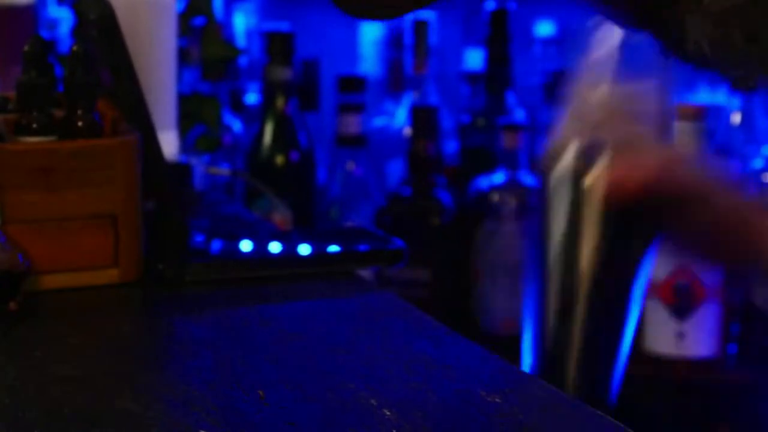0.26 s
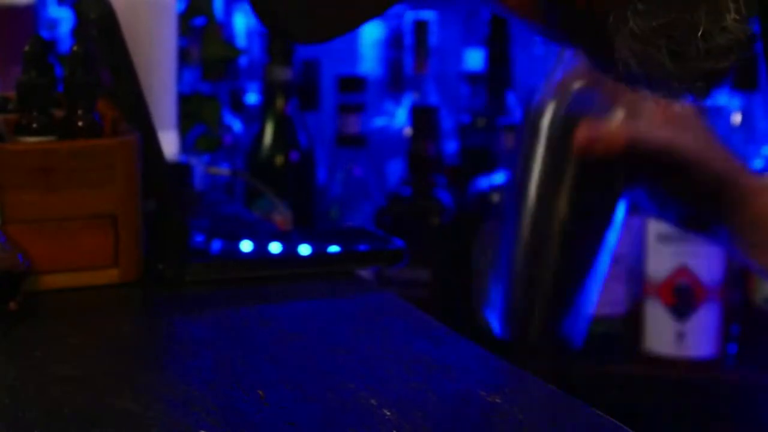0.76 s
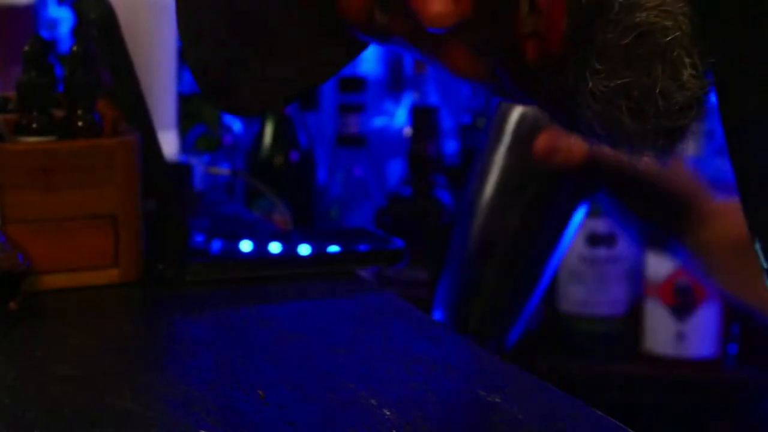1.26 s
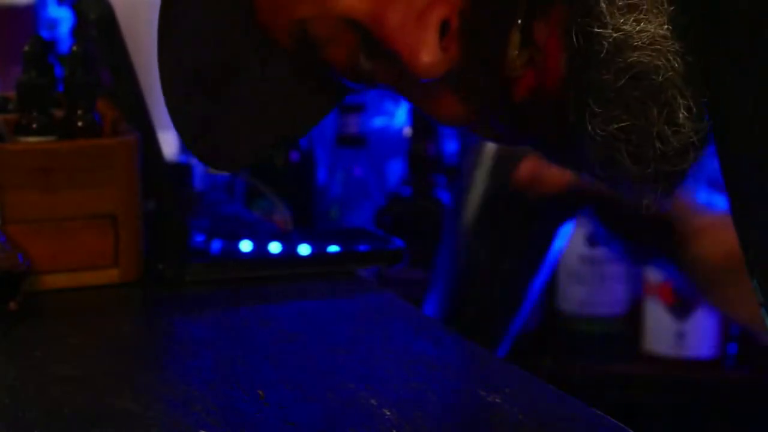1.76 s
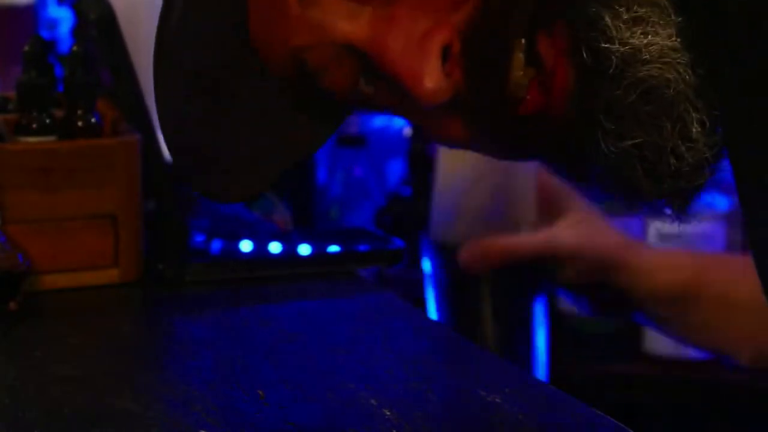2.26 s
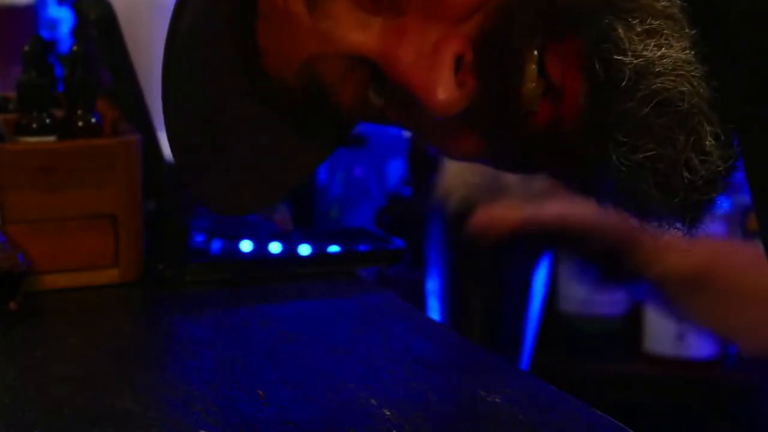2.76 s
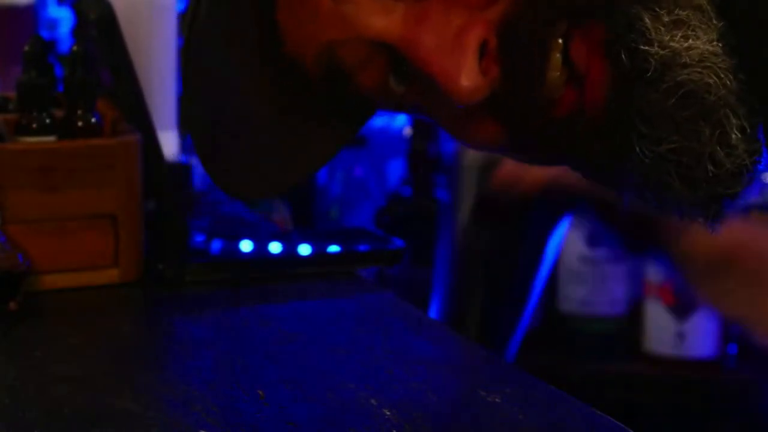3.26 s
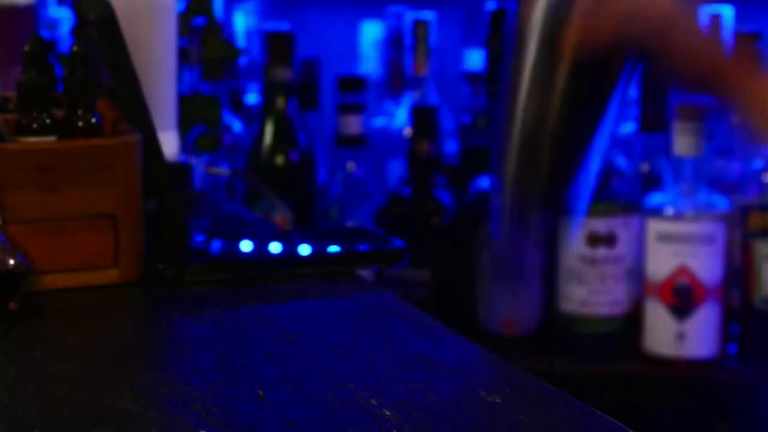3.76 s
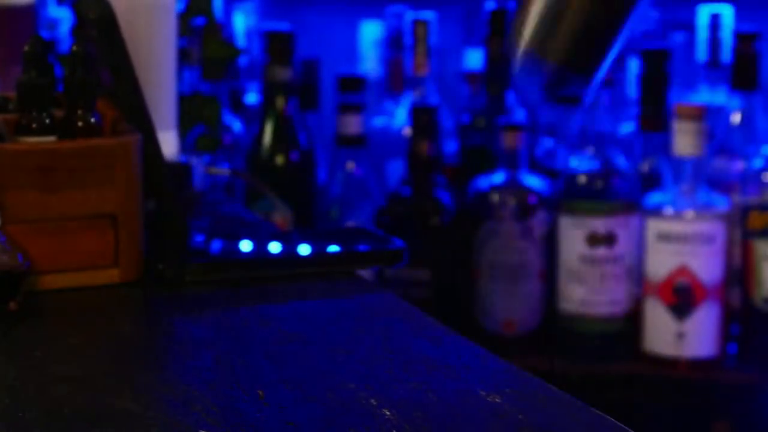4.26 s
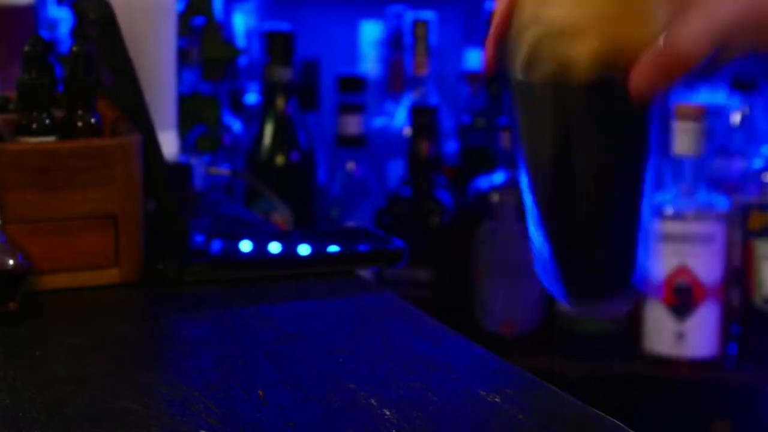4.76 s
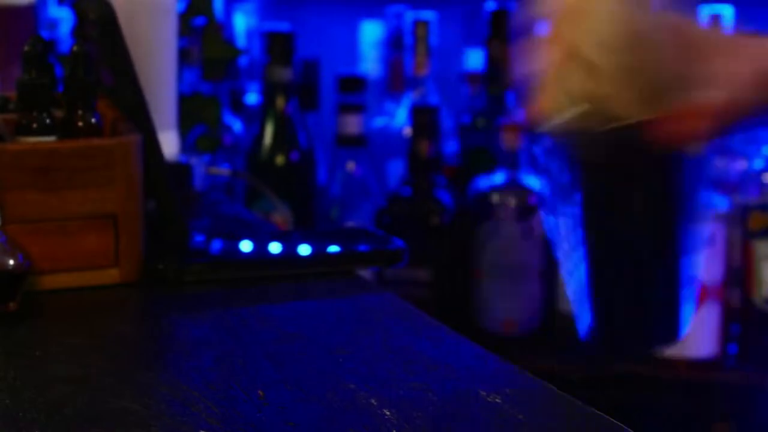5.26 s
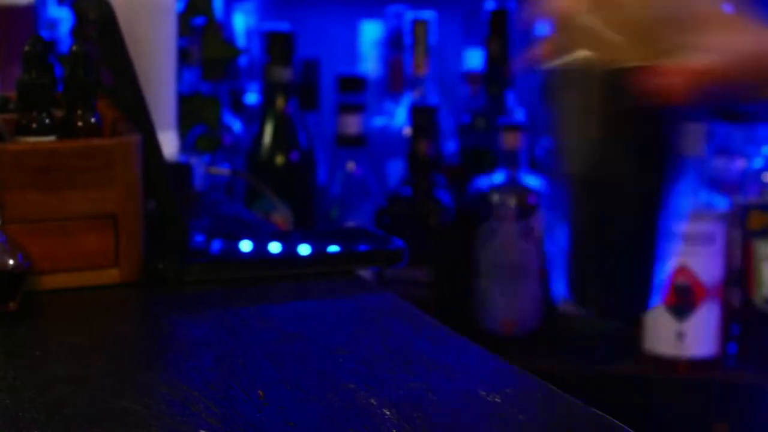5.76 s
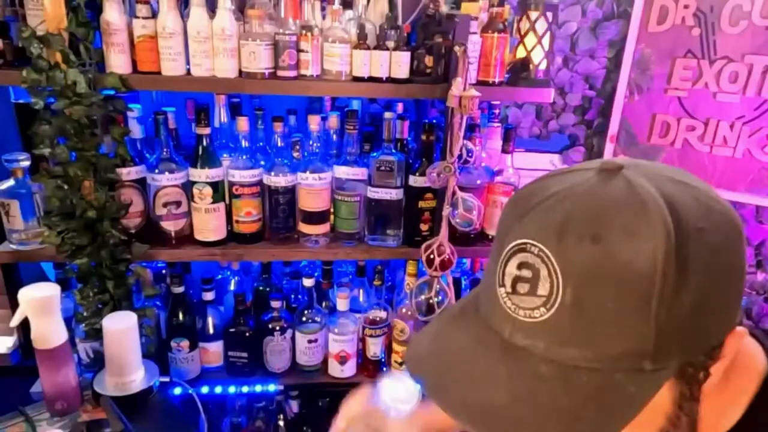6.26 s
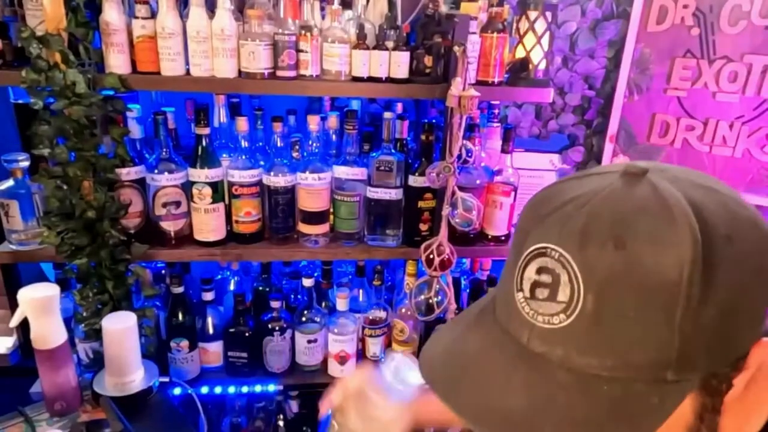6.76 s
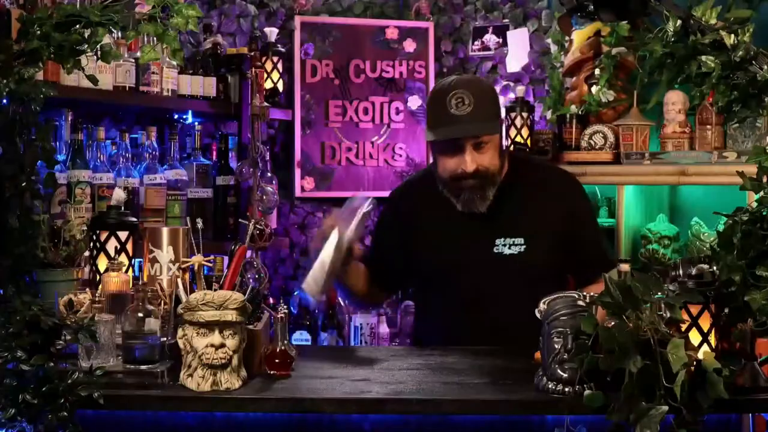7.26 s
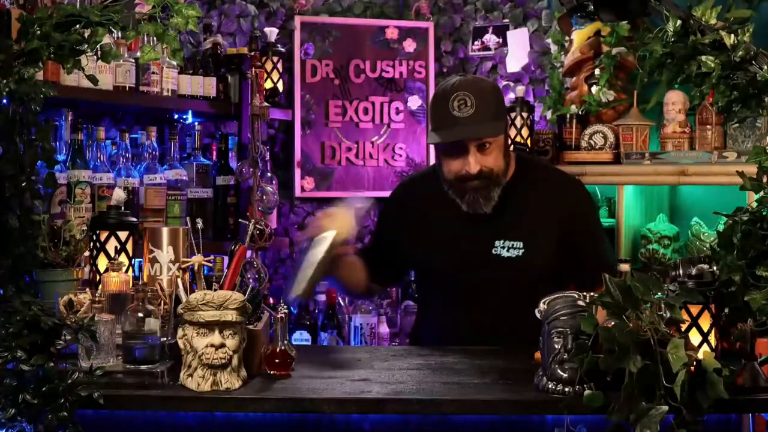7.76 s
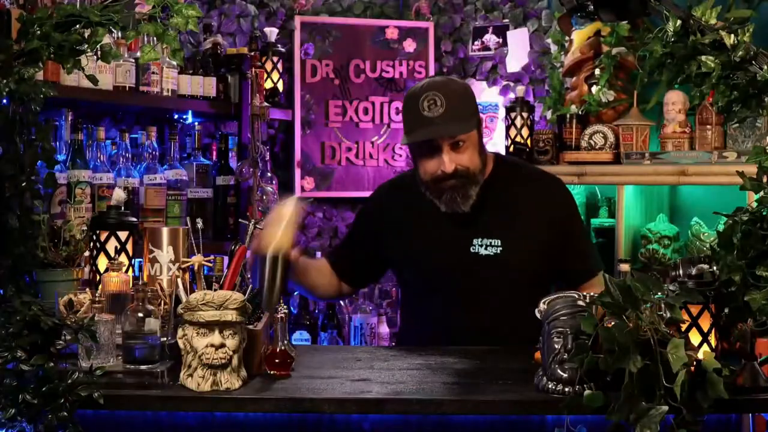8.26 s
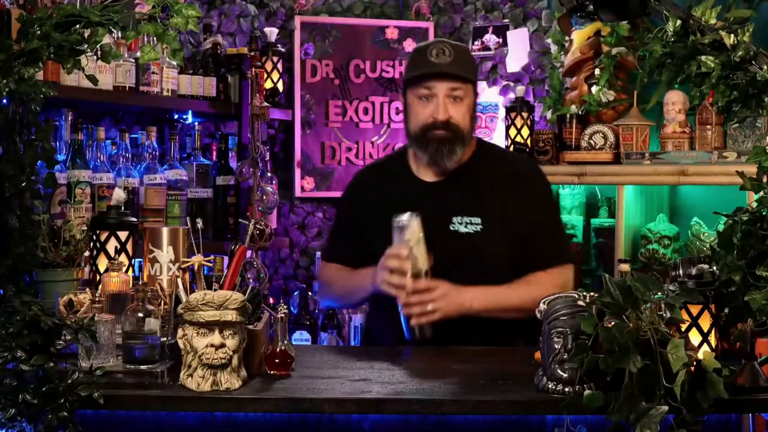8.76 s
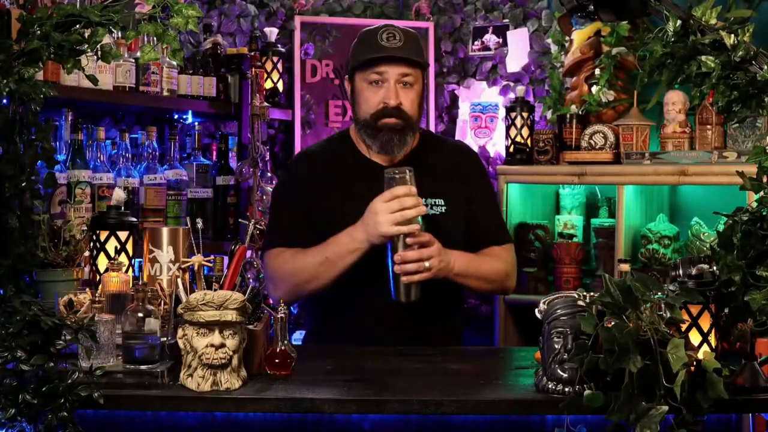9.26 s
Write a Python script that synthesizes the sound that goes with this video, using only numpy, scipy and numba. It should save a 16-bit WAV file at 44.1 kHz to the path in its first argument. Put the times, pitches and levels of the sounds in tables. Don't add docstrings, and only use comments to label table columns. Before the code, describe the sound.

A dense run of ice knocks inside a hand-damped shaker: dry clacks on wet glass, duller metallic knocks on tin, brief hollow tones and small splintering cracks. The rhythm is irregular, with tiny gaps falling nearly silent at first and stronger clusters from the middle on. Very little room, only a short diffuse tail from close walls. Near the end the rattling thins, then one sharp slap with a low thump, and small settling clicks.

```python
import sys
import numpy as np
from scipy import signal
from scipy.io import wavfile
from scipy.ndimage import uniform_filter1d, minimum_filter1d
from numba import njit

SR = 44100
rng = np.random.default_rng(int(sys.argv[2]) if len(sys.argv) > 2 else 0)


def gain_from_decibels(decibels):
    exponent = np.asarray(decibels, float) / 20
    return 10 ** exponent


def int16_out(signal):
    q = np.round(np.clip(np.atleast_2d(signal).T, -1, 1) * 32767)
    wavfile.write(sys.argv[1], SR, q.astype(np.int16))


N = 419391


def rumble():
    # start_s, level_db
    shudder = [
        (0.0, -107),
        (1.3, -77.5),
        (1.53, -99),
        (2.429, -81),
        (2.88, -69.5),
        (4.579, -74),
        (5.82, -100.5),
        (6.268, -85),
        (8.311, -72),
        (9.5, -99),
    ]
    start_s, level_db = np.transpose(shudder)
    band = signal.butter(2, [70., 105.], "bandpass", fs=SR, output="sos")
    x = signal.sosfilt(band, rng.standard_normal(N))
    level = gain_from_decibels(np.interp(np.arange(N) / SR, start_s, level_db) + 1.5)
    return x / np.sqrt(np.mean(x ** 2)) * level


def room(x):
    t60_s, gap_s, level_db = 0.19, 0.0015, -10.5
    t = np.arange(int(.4 * SR)) / SR
    tail = rng.standard_normal(len(t)) * gain_from_decibels(-60 * t / t60_s) * (t > gap_s)
    tail /= np.sqrt(np.sum(tail ** 2))
    return signal.fftconvolve(x, tail)[:N] * gain_from_decibels(level_db)


def ticks(table, db, rise_s, t60_s, spread):
    out, t = np.zeros(N + SR), np.arange(SR // 10) / SR
    shape = gain_from_decibels(-60 * t / t60_s) * (1 - np.exp(-t / rise_s))
    shape /= shape.max()
    for start_s, peak_db, pitch_hz in table:
        phase = 2 * np.pi * pitch_hz * t
        neighbours = np.sin(phase * (1 - spread)) + np.sin(phase * (1 + 1.4 * spread))
        tone = 1.08 * np.sin(phase) + 0.21 * neighbours
        out[int(start_s * SR):][:len(t)] += gain_from_decibels(peak_db + db) * shape * tone
    return out[:N]


def hollow_ticks():
    # start_s, peak_db, pitch_hz
    hollow_strikes = [(0.458, -28, 738), (2.943, -28.5, 600), (3.183, -37, 746), (3.599, -30, 623),
                      (3.639, -28.5, 753), (3.819, -30, 594), (3.864, -31, 890), (4.288, -32, 880),
                      (4.32, -33, 567), (4.381, -27, 560), (4.416, -28, 1075), (4.458, -36, 995),
                      (4.544, -29, 680), (4.576, -27, 944), (4.634, -28.5, 820), (4.875, -28.5, 1113),
                      (5.313, -25.5, 956), (5.337, -29.5, 1086), (5.453, -29, 523), (5.611, -25, 1043),
                      (5.887, -28, 575), (6.452, -31, 265), (6.488, -31, 510), (6.609, -32, 805),
                      (6.92, -26, 593), (6.973, -31.5, 570), (7.199, -36, 860), (7.209, -35, 550),
                      (7.631, -32, 820), (8.247, -33, 775), (8.268, -33, 533), (8.53, -23, 583),
                      (8.585, -35, 680)]
    return ticks(hollow_strikes, -3.0, rise_s=0.00052, t60_s=.055, spread=.2)


def tin_ticks():
    # start_s, peak_db, pitch_hz
    tin_strikes = [(0.647, -21.5, 1730), (1.363, -25, 1890), (1.374, -32, 1810), (2.077, -24.5, 1620),
                   (2.947, -26, 1850), (3.171, -27, 1320), (3.185, -27, 1800), (3.312, -30, 2400),
                   (3.329, -20.5, 1770), (3.527, -28, 1870), (3.55, -26, 1850), (3.821, -21, 2470),
                   (3.993, -20.5, 1900), (4.024, -19.5, 1760), (4.239, -22.5, 1850), (4.419, -14, 1750),
                   (4.565, -20, 2270), (4.577, -31, 1160), (4.612, -23, 2290), (5.884, -18.5, 2260),
                   (5.009, -25.5, 2520), (5.073, -23, 2150), (5.111, -26.5, 2010), (5.306, -15.5, 1730),
                   (5.446, -18.5, 1705), (5.454, -22, 1690), (5.607, -15, 1306), (5.616, -18, 1360),
                   (5.78, -24.5, 1850), (5.795, -23.5, 2010), (5.813, -25, 1920), (6.245, -30, 1800),
                   (6.252, -21, 1860), (6.316, -24, 1720), (6.346, -26.5, 1770), (6.451, -26, 1630),
                   (7.62, -21, 1730), (7.751, -27.5, 2490), (7.958, -24, 2380), (8.113, -29, 1830),
                   (8.249, -32, 2100), (8.568, -25, 2220), (8.618, -23.5, 1660)]
    return ticks(tin_strikes, -4.3, rise_s=0.00028, t60_s=0.042, spread=0.15)


def glass_ticks():
    # start_s, peak_db, pitch_hz
    glass_strikes = [(0.687, -23.5, 3250), (1.251, -24, 4800), (1.261, -21, 2890), (1.299, -27, 2930),
                     (1.361, -23.5, 4500), (1.373, -23, 3050), (1.587, -22, 5320), (1.972, -25, 3120),
                     (2.066, -15.5, 5060), (2.643, -27.5, 5330), (2.751, -26.5, 4600), (2.946, -22.5, 4940),
                     (3.119, -24.5, 4760), (3.311, -19.5, 4300), (3.324, -17.5, 4550), (3.41, -21, 4400),
                     (3.52, -19.5, 3430), (3.822, -17.5, 4800), (3.838, -30, 5150), (3.864, -27.5, 3100),
                     (4.012, -25.5, 3050), (4.111, -24, 4350), (4.141, -23.5, 3230), (4.25, -23.5, 4270),
                     (4.273, -21.5, 4150), (4.546, -15.5, 3300), (4.576, -27, 2680), (4.883, -8, 2530),
                     (5.007, -26, 3100), (5.303, -18.5, 2530), (5.314, -17, 2460), (5.446, -14, 3270),
                     (5.505, -28, 3450), (5.547, -27, 3250), (5.603, -23, 5140), (5.623, -21, 4340),
                     (6.098, -28.5, 5150), (6.132, -25.5, 4000), (6.196, -24, 2960), (6.609, -23.5, 4020),
                     (7.2, -16, 3160), (7.692, -27, 3220), (7.749, -27.5, 4360), (7.789, -26, 4100),
                     (7.923, -21, 4740), (7.951, -23, 4640), (7.974, -25, 3200), (8.077, -19, 4130),
                     (8.249, -19, 4620), (8.258, -16.5, 3460), (8.421, -20, 4700), (8.427, -23, 4870),
                     (8.537, -25, 3930), (8.568, -29, 3340), (8.616, -26.5, 4000),
                     (.583, -26, 5050), (.591, -27, 3000), (0.632, -23, 4870), (.674, -29, 3000),
                     (0.71, -30, 3570), (1.575, -29.5, 3070), (2.242, -30, 4720), (3.187, -32, 2800),
                     (3.278, -25.5, 4300), (5.316, -20, 3500), (7.091, -36, 4730), (5.837, -28.5, 4300),
                     (6.051, -28, 3170), (6.211, -32, 3100), (6.312, -11, 3380), (6.483, -32.5, 3650),
                     (7.334, -28, 3220), (7.969, -22.5, 4800)]
    return ticks(glass_strikes, -0.23, rise_s=0.00044, t60_s=0.008, spread=0.28)


def notes(table, db, rough, glide=0.):
    out, t = np.zeros(N + SR), np.arange(SR // 4) / SR
    for start_s, peak_db, pitch_hz, t60_s in table:
        wobble = uniform_filter1d(rng.standard_normal((2, len(t))), size=130) * rough
        decay = gain_from_decibels(-60 * t / max(t60_s, .004))
        shape = decay * (1 - np.exp(-t / 0.00069)) * (1 + wobble[0])
        tone = np.sin(2 * np.pi * pitch_hz * t * (1 + glide * t) + wobble[1])
        out[int(start_s * SR):][:len(t)] += gain_from_decibels(peak_db + db) * shape * tone
    return out[:N]


def hollow_notes():
    # start_s, peak_db, pitch_hz, t60_s
    cavity = [(0.173, -40.5, 544, 0.23), (0.304, -54, 610, 0.14), (0.358, -49, 660, 0.24),
              (0.429, -39, 624, 0.22), (0.693, -26, 1044, 0.059), (1.129, -28, 958, 0.14),
              (2.493, -31.5, 720, 0.11), (2.761, -28, 814, 0.058), (3.178, -25, 780, 0.079),
              (3.41, -29, 763, 0.12), (4.416, -43.5, 542, 0.27), (5.013, -12.5, 730, 0.0085),
              (7.468, -21.5, 594, 0.049), (8.721, -27.5, 556, 0.1), (8.95, -54, 360, 0.36)]
    # start_s, peak_db, pitch_hz, t60_s
    palm_thump = [
        (9.198, -32, 115.7, 0.16),
    ]
    return notes([*cavity, *palm_thump], -1.1, rough=5.7, glide=-0.53)


def tin_notes():
    # start_s, peak_db, pitch_hz, t60_s
    tin_ring = [(0.3661, -44, 1787, 0.29), (0.5802, -30, 1705, 0.12), (0.631, -30, 1756, 0.16),
                (0.829, -43, 1740, 0.38), (1.2517, -31, 1686, 0.34), (1.9706, -31, 1802, 0.49),
                (3.9923, -27, 1885, 0.2), (4.2005, -26, 1650, 0.11), (4.4187, -35.5, 1655, 0.3),
                (4.421, -34, 3065, 0.37), (5.7791, -51, 1756, 0.19), (7.1277, -37.5, 1770, 0.31),
                (8.0795, -45, 1800, 0.23), (8.4068, -24, 1876, 0.2), (9.1169, -49.5, 2016, 0.12)]
    return notes(tin_ring, -2, rough=7.5)


def wall_notes():
    # start_s, peak_db, pitch_hz, t60_s
    wall_ring = [
        (3.9923, -13, 1787, 0.026),
        (4.5456, -8.5, 2383, 0.013),
        (4.8758, -7, 4310, 0.017),
        (5.445, -5, 3347, 0.013),
        (5.879, -5, 3164, 0.015),
        (7.199, -14.5, 1820, 0.03),
        (7.9219, -9, 4220, 0.0079),
        (8.531, 6.5, 3650, 0.0037),
        (9.1915, 0, 3886, 0.0074),
    ]
    return notes(wall_ring, 0.0, rough=7.0)


def knocks():
    # start_s, crack_db, rebound_db, thud_db (above the rebounds)
    tin_wet = [(1.064, -45, -45.5, -6), (1.125, -14, -28.5, 3), (1.249, -10.5, -34, -4),
               (1.289, -11, -31, -12.5), (2.459, -36, -39.5, -5), (2.91, -29, -30, -4),
               (3.615, -8.5, -39, 9), (4.14, -12, -38.5, -4), (4.2, -6, -54, -32), (4.415, -5, -21.5, -7),
               (4.681, -32, -28.5, 1), (5.288, -27, -29, -12.5), (5.779, -15.5, -25.5, -12),
               (5.809, -40, -32.5, -2), (6.192, -12.5, -18, -8.5), (6.448, -15.5, -26, -1),
               (7.067, -16, -33, -28), (7.965, -7, -31, -12), (8.567, -23, -30.5, -2),
               (8.618, -24, -25, -11), (9.116, -70, -56, 3), (9.485, -57, -46, -8.5)]
    tin_bare = [(1.086, -71, -44.5, -17), (2.376, -43.5, -62, -2), (2.643, -25, -21.5, -19),
                (2.683, -12.5, -37.5, -23), (3.492, -37, -41.5, -2), (4.378, -4.5, -55, -15),
                (4.609, -1.5, -27.5, -6), (5.071, -10, -29.5, -1.5), (5.501, -13, -29.5, -8.5),
                (5.6, -9, -23, 0.5), (5.708, -26, -58.5, 12.5), (6.095, -14, -31.5, -3.5),
                (6.307, 1.5, -21.5, -5), (6.553, -17.5, -35, -3.5), (7.032, -9.5, -30, -3.5),
                (7.326, -30, -28.5, -4.5), (7.468, -11, -53, -5.5), (8.879, -31, -26, -7.5)]
    seam_wet = [(0.356, -21, -29.5, -34), (0.677, -18.5, -24.5, -3), (0.799, -34, -47.5, -18),
                (0.826, -25, -32.5, -35), (1.319, -15, -24.5, -10.5), (1.357, -16, -19, -5.5),
                (1.966, -19, -21.5, -20.5), (2.44, -32, -40.5, -6.5), (2.491, -15, -28, -5),
                (2.612, -28, -30, -23), (3.084, -14, -37.5, -8.5), (3.406, -10, -23.5, -13),
                (3.518, -12.5, -24.5, -12.5), (3.99, -6.5, -19.5, -27), (4.273, -14, -22.5, -0.5),
                (4.544, -1.5, -16.5, -5), (5.148, -18, -36.5, -4.5), (5.443, -10, -17, -8),
                (5.552, -13, -20.5, -8.5), (6.265, -7.5, -29.5, 0.5), (6.394, -11.5, -28, -7.5),
                (6.655, -17.5, -31, -7), (6.898, -45, -35.5, -9.5), (7.122, -21.5, -43, -28),
                (7.538, -22, -29.5, -16), (7.686, -22.5, -34, -6), (8.408, -10, -16, -13)]
    seam_bare = [(0.001, -9, -36, 4.5), (0.137, -47, -57, -2), (0.165, -30, -30, -6), (0.431, -41, -43, 4),
                 (0.452, -20, -27, -4), (0.876, -19.5, -31.5, -13), (2.241, -24, -44, 5),
                 (2.942, -17.5, -33, -11), (3.117, -24, -34, -0.5), (3.821, -9, -20.5, -2),
                 (3.93, -19, -33.5, -9.5), (4.107, -3.5, -26.5, 5), (4.797, -52.5, -85, 42),
                 (5.004, -12.5, -30.5, -2.5), (5.878, -2.5, -27, 0.5), (6.033, -18, -30.5, 3.5),
                 (6.482, -22, -45, 2), (6.751, -8, -27, -7), (6.963, -30, -70, 8), (7.198, -4, -25, -7.5),
                 (7.787, -12, -42, -5), (7.947, -12, -57, -2), (8.53, 1.5, -18, -3.5),
                 (8.718, -14.5, -28, -1.5)]
    glass_wet = [(0.562, -29, -35.5, -12), (0.627, -11, -33, -36), (0.908, -8.5, -26, -6.5),
                 (1.539, -48, -38, -4), (1.765, -51, -48.5, -1.5), (2.746, -10, -41, -5),
                 (3.097, -13.5, -37, -20), (3.325, -15.5, -59, -12), (3.637, -8.5, -40, -2),
                 (3.806, -22.5, -25.5, -1.5), (4.233, -12.5, -28, -2.5), (4.322, -14.5, -45, -20),
                 (4.722, -13, -53, 11), (4.875, 4, -11, -17.5), (5.095, -21, -29.5, 2),
                 (5.76, -29, -47, -9), (6.129, -13.5, -33, -5.5), (6.605, -11.5, -36.5, 5),
                 (6.847, -61, -57, -4), (7.751, -18, -29, 3.5), (8.258, -9.5, -39, -1.5),
                 (8.969, -26.5, -55, 4.5), (9.388, -48, -58, 8), (9.501, -24, -37, -49)]
    glass_bare = [(1.223, -15, -25.5, -25), (1.8, -28, -35, -7), (1.812, -16, -39, -1.5),
                  (2.064, -5, -21, -8.5), (2.265, -8.5, -31, -14), (2.734, -15, -37, -10),
                  (3.044, -26, -36, -20), (3.352, -6.5, -27, -24), (3.568, -5.5, -21, -10.5),
                  (4.284, -8, -50, -22), (6.048, -24.5, -38, -3), (7.616, -5.5, -23.5, -3.5),
                  (7.919, -23, -27.5, -20.5), (8.073, -21.5, -25.5, -14.5), (8.209, -12.5, -20.5, -7.5),
                  (8.353, -11.5, -32, -17.5)]
    # start_s, crack_db, rebound_db, thud_db
    tin_blunt = [(0.577, -7.5, -27, -25), (0.647, -36, -41, -8), (0.933, -30, -54, 12.5),
                 (2.757, -8.5, -31.5, 2.5), (2.81, -14, -38, -4.5), (3.166, -20, -20.5, -25),
                 (3.307, -22, -17, -17), (5.109, -17, -35, -23), (5.312, -14, -9, -26.5),
                 (5.986, -17.5, -35, -7.5)]
    # start_s, crack_db, rebound_db, thud_db
    glass_clink = [(0.303, -37, -48.5, -5), (0.542, -26.5, -48, -19), (1.583, -15, -29, -5.5),
                   (1.925, -23, -38.5, -17), (2.228, -37, -44.5, -1), (2.53, -24, -49, -2),
                   (3.275, -16.5, -27, -22), (5.304, -49, -35, -20), (6.926, -12, -29, -8.5),
                   (7.366, -10.5, -32.5, -8.5), (7.451, -62, -49.5, 2), (8.376, -8.5, -42, -18.5)]
    # start_s, crack_db, rebound_db, thud_db
    splits = [
        (3.174, -15, -43.5, 6.5),
        (4.846, -15.5, -53.5, -7),
        (5.965, -41, -45, -7),
        (6.157, -51.5, -55, 6),
        (8.067, -33.5, -35, -8),
        (8.87, -14, -38, -25),
    ]
    # start_s, crack_db, rebound_db, thud_db
    palm = [
        (9.193, -2.5, -20, -12),
    ]
    # wall_db, clack_db, splinter_db
    colours = [
        (1.6, -5, -24.5),
        (0.6, -10, -17),
        (-5, -5, -21.5),
        (-2, -2.5, -10.5),
        (-3, 0.2, -15.5),
        (-6, -2, -13),
        (-8, -16, -55),
        (-10, -1, -11.5),
        (-2, -5.5, -1),
        (-3.5, -5, 1.5),
    ]
    tables = (tin_wet, tin_bare, seam_wet, seam_bare, glass_wet, glass_bare,
              tin_blunt, glass_clink, splits, palm)
    rows = []
    for table, colour in zip(tables, colours):
        for start_s, crack_db, rebound_db, thud_db in table:
            rows.append((start_s, crack_db, rebound_db + thud_db, *(rebound_db + np.array(colour))))
    return np.array(sorted(rows))


def grains(scatter_db):
    x = rng.standard_normal(N) * gain_from_decibels(scatter_db * np.minimum(rng.exponential(size=N), 6))
    return x / np.sqrt(np.mean(x ** 2))


def held(at, values):
    latest = np.searchsorted(at, np.arange(N), side="right") - 1
    return values[np.clip(latest, 0, None)]


@njit
def resonate(crack, rebound, snap, shower, keep, hz, width):
    y = np.empty(len(snap))
    c = c0 = r = r0 = b = l = b2 = l2 = last = g = k = 0.
    for i in range(len(y)):
        if hz[i] != last:
            last, g, k = hz[i], np.tan(np.pi * hz[i] / SR), width[i] / hz[i]
        c, c0 = c * keep[0] + crack[i], c0 * keep[1] + crack[i]
        r, r0 = r * keep[2] + rebound[i], r0 * keep[3] + rebound[i]
        drive = snap[i] * (c - c0) + shower[i] * (r - r0) + 1e-18
        v = (b + g * (drive - l)) / (1 + g * (g + k))
        b, l = 2 * v - b, l + 2 * g * v
        w = (b2 + g * (k * v - l2)) / (1 + g * (g + k))
        b2, l2, y[i] = 2 * w - b2, l2 + 2 * g * w, k * w
    return y


def contact_ticks(rows, at, total_db, snap):
    tick_s, lag_s = 0.00032, 0.0018
    keep = np.exp(-1 / SR / np.array([tick_s, tick_s / 2, 1, 1]))
    dull_db = 1.25 * rows[:, 1] + 8.6
    bright_db = rows[:, 1] + rows[:, 5] - total_db - 1.5
    out, silent = np.zeros(N), np.zeros(N)
    for hz, width_hz, db in ((3560.0, 2900.0, dull_db), (10800.0, 19000.0, bright_db)):
        tick = np.zeros(N)
        tick[at + int(lag_s * SR)] = gain_from_decibels(db)
        out += resonate(tick, silent, snap, snap, keep, np.full(N, hz), np.full(N, width_hz))
    return out


def ice():
    # pitch_hz, width_hz, level_db
    thud = [(123, 170, -9), (263.3, 146, -0.5), (387, 136, -3), (567, 238, 1), (763, 78, 2.5),
            (972, 350, -0.5)]
    wall = [(1420, 470, -2), (1756, 250, 5.5), (2260, 297, 3.5), (2817, 860, -2)]
    clack = [(3208, 280, 8.5), (3650, 960, 2), (4320, 800, 3.5), (4776, 580, 7), (5460, 300, 2.5),
             (6350, 700, 2.5)]
    splinter = [(6740, 3900, 2), (8530, 3100, 0), (10580, 1800, -7.5), (12600, 3000, -15),
                (14400, 2700, -20.5)]
    # start_s, level_db
    facing = [
        (0, -0.5),
        (3.7, 0.5),
        (4.6, 8),
        (6.3, 5),
        (7.3, 10),
        (9.5, 2.5),
    ]
    # start_s, level_db
    wetted = [
        (0.6, 3.5),
        (1.1, -5.5),
        (2.7, -5),
        (3.2, 2.5),
        (6.3, 0.5),
        (6.8, 2.5),
    ]
    crack_s, crack_rise_s, rise_s, rebound_t60_s = 0.0017, 0.00083, 0.0059, 0.14
    flare_s, patch_db = 0.0012, 4.0
    detune, place_db = 0.03, 2.8
    rows = knocks()
    at = (rows[:, 0] * SR).astype(int)
    knock = held(at, np.arange(len(at)))
    total_db = 10 * np.log10(np.sum(gain_from_decibels(rows[:, 2:]) ** 2, axis=1))
    keep = np.exp(-1 / SR / np.array([crack_s, crack_rise_s, rebound_t60_s / np.log(1000), rise_s]))
    snap, shower = rng.standard_normal(N), grains(5.3)
    strikes = 1. * (np.abs(snap[::-1]) > 3.0)
    flare = 0.73 + 0.74 * signal.lfilter([1], [1, -np.exp(-1 / (flare_s * SR))], strikes)
    patches = uniform_filter1d(uniform_filter1d(snap, size=400), size=400)
    patches = gain_from_decibels(patch_db * patches / np.std(patches))
    shower = shower / np.sqrt(np.mean(patches ** 2))
    snap = np.sign(snap)
    out = contact_ticks(rows, at, total_db, snap)
    blur = 0.75 + 0.11 * np.maximum(total_db + 23.5, 0)
    facing_db = np.interp(rows[:, 0], *np.transpose(facing))
    wetted_db = np.interp(rows[:, 0], *np.transpose(wetted))
    for column, modes in enumerate((thud, wall, clack, splinter)):
        power = sum(gain_from_decibels(db) ** 2 * np.pi * width / SR for _, width, db in modes)
        fade = 1 + 0.079 * column
        for hz, width, db in modes:
            chance = rng.standard_normal((len(at), 2))
            mode_db = db + place_db * chance[:, 0] - 10 * np.log10(blur)
            mode_db += (hz > 10500) * facing_db + (900 < hz < 1500) * wetted_db
            rebound_db = mode_db + rows[:, 2 + column]
            crack, rebound = np.zeros(N), np.zeros(N)
            crack[at] = gain_from_decibels(rebound_db + rows[:, 1] - total_db - 1.0)
            rebound[at] = gain_from_decibels(rebound_db + 2.0)
            pitch = np.minimum(hz * (1 + detune * chance[:, 1]), .45 * SR)[knock]
            own = np.roll(shower * patches, rng.integers(N)) * flare
            ring = resonate(crack, rebound, snap, own, keep ** [1, 1, fade, 1], pitch, width * blur[knock])
            out += ring / np.sqrt(power)
    return out


def scene():
    near = ice() + wall_notes() + tin_notes() + hollow_notes()
    near += glass_ticks() + tin_ticks() + hollow_ticks()
    return (near + room(near) + rumble())[None]


def noise_gate(x):
    threshold_db, tilt_db, ratio = -81.5, -17, 1.8
    spectrum = signal.stft(x, nperseg=512, noverlap=384)[2]
    heard = uniform_filter1d(uniform_filter1d(np.abs(spectrum), size=3, axis=2), size=11, axis=1)
    threshold = gain_from_decibels(threshold_db + tilt_db * np.linspace(0, 1, heard.shape[1])[:, None])
    gain = np.minimum(heard / threshold + 1e-9, 1) ** (ratio - 1)
    return signal.istft(spectrum * gain, nperseg=512, noverlap=384)[1][:, :N]


def duck_treble(x):
    depth_db, split_hz = -36, 1300
    treble = signal.sosfiltfilt(signal.butter(2, split_hz, "highpass", fs=SR, output="sos"), x)
    now = uniform_filter1d(np.abs(treble), size=90)
    coming = np.roll(-minimum_filter1d(-now, size=500), -330)
    passed = np.minimum(now / (coming * gain_from_decibels(depth_db) + 1e-12), 1) ** 2
    return x - treble * uniform_filter1d(1 - passed, size=60)


def low_pass(x):
    return signal.sosfilt(signal.butter(12, 16540, fs=SR, output="sos"), x)


def record(dry):
    clean = duck_treble(noise_gate(dry))
    cut = signal.sosfilt(signal.ellip(8, .2, 70, 15800, fs=SR, output="sos"), clean)
    cut = signal.sosfilt(signal.butter(1, 140, "highpass", fs=SR, output="sos"), cut)
    return low_pass(cut)


dry = scene()
out = record(dry)
int16_out(out)
```